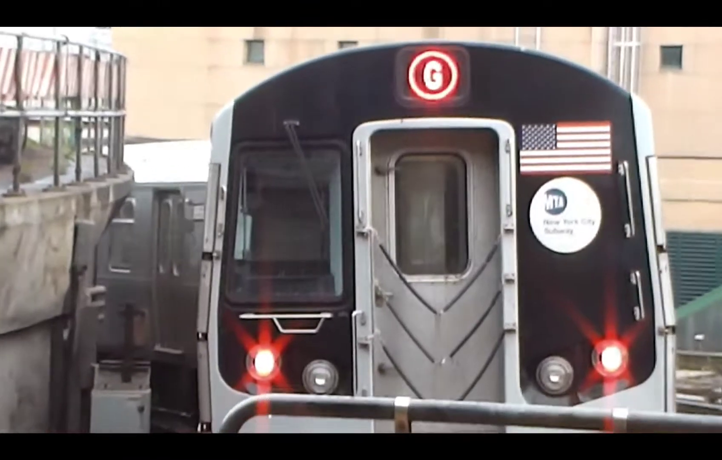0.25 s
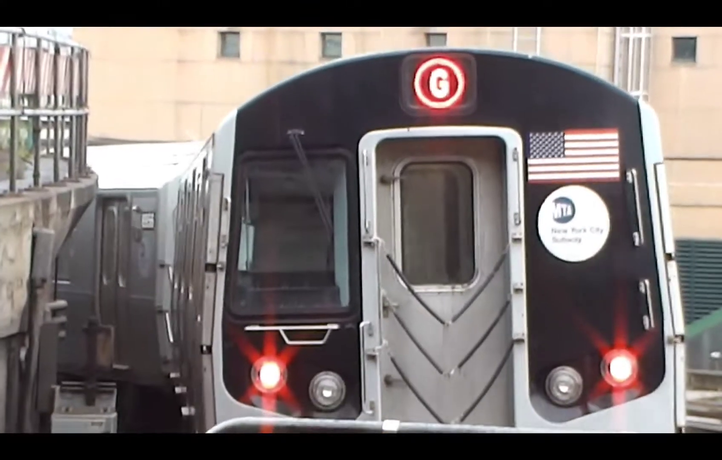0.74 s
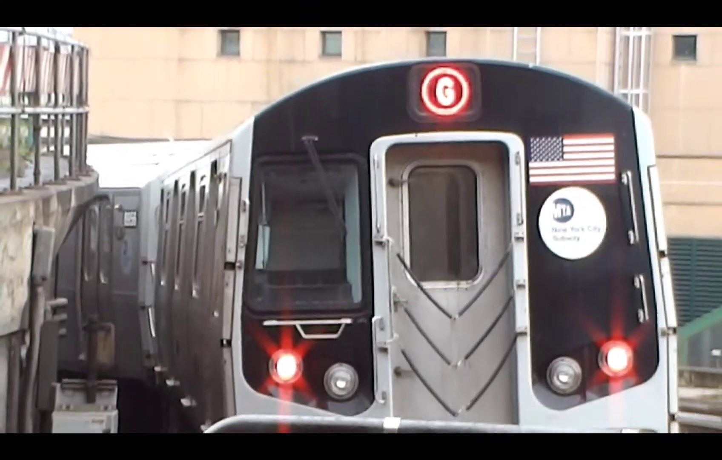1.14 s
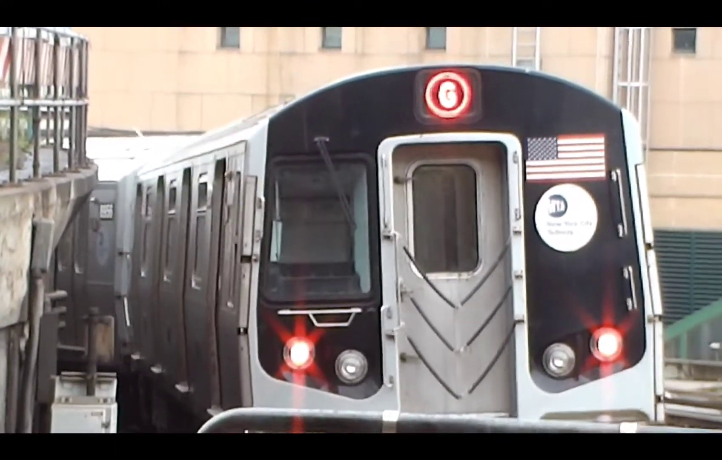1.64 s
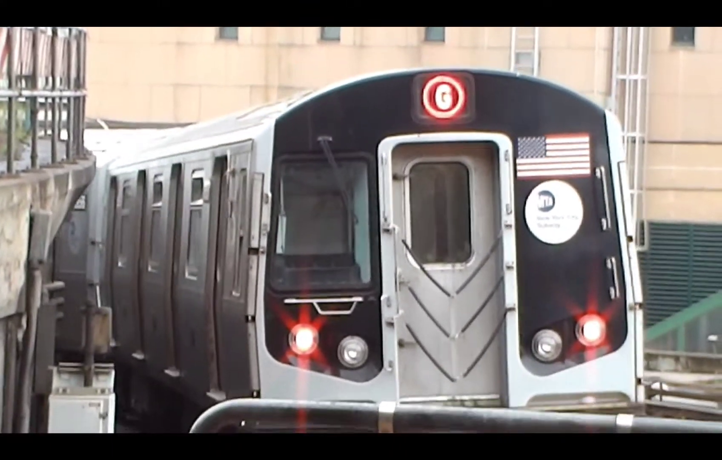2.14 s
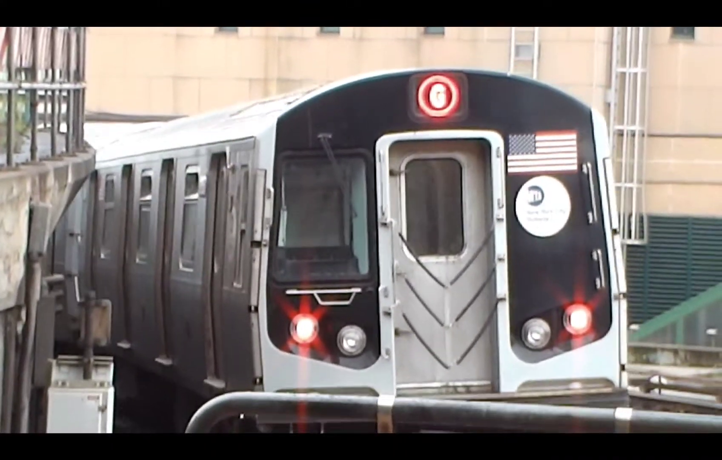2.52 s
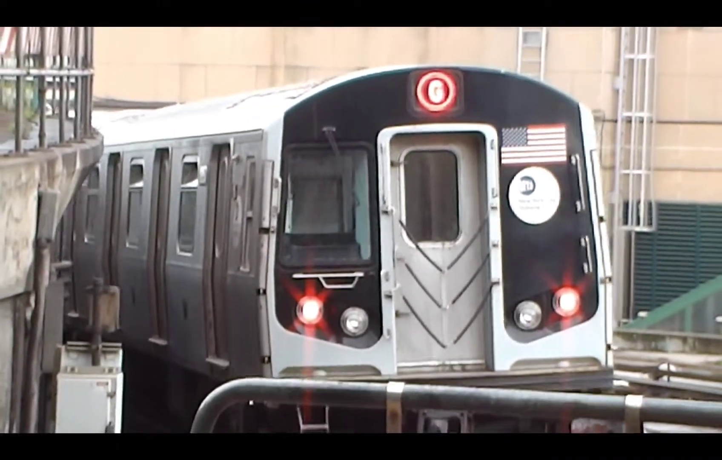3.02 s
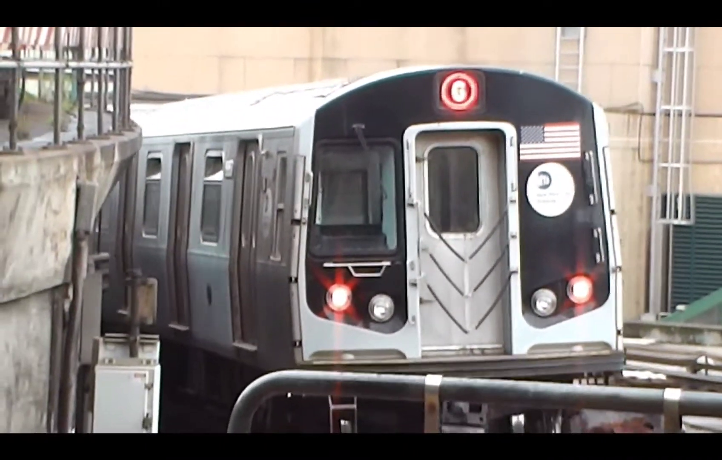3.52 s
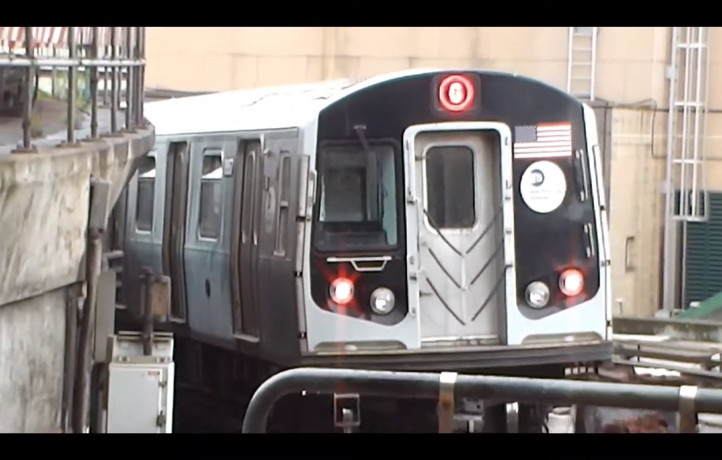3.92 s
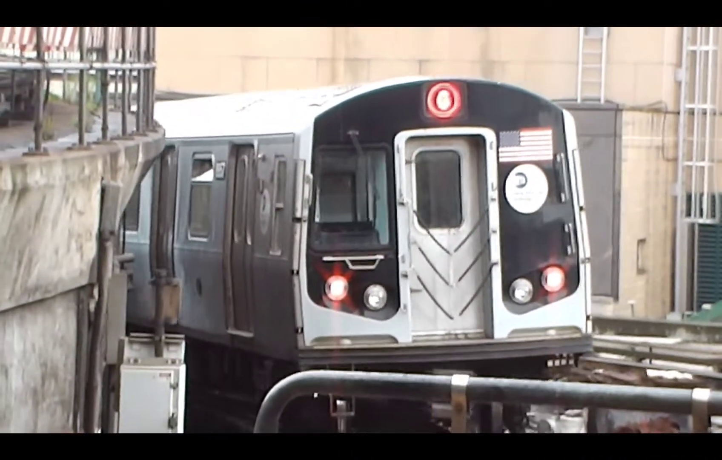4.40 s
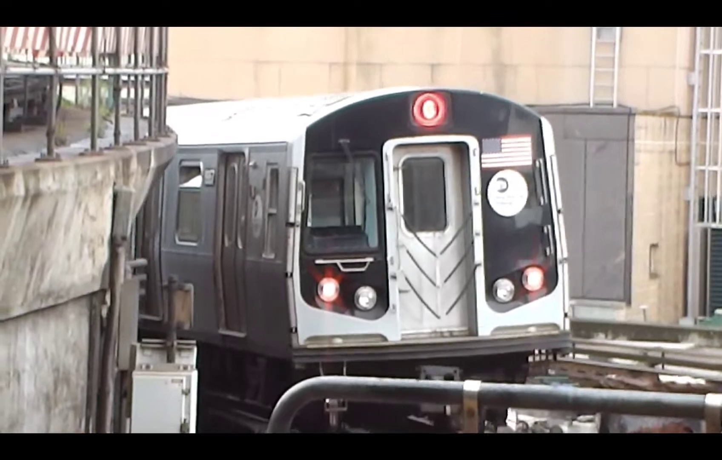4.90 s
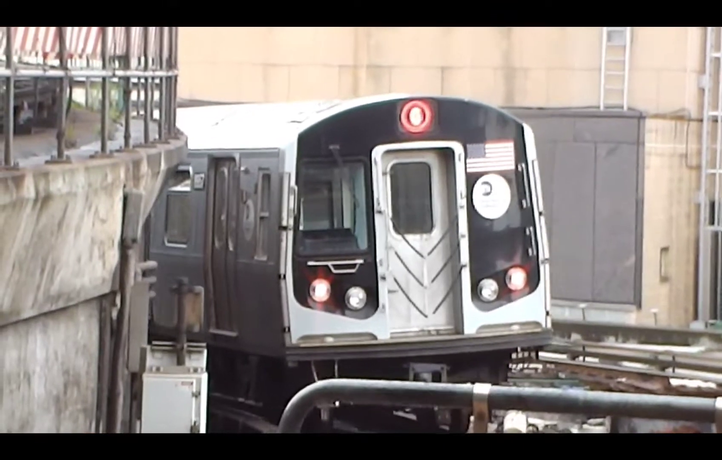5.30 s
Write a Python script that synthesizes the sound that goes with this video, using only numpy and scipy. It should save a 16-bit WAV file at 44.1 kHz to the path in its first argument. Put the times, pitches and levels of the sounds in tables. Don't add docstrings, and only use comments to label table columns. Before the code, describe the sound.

A subway train draws away round an outdoor curve, heard in stereo from near the track. A piercing, steady squeal pulses rapidly throughout over rumble, gear hum and scattered joint thumps. Flange hiss is harshest between one and two seconds, when low rail groans join. Later, higher metallic shrieks and thin breathy whistles come forward. The microphone's level dips after the sharpest peaks, and the squeal is still going at the end.

```python
import sys
import numpy as np
from scipy import signal
from scipy.fft import rfft, irfft, next_fast_len
from scipy.io import wavfile
from scipy.ndimage import uniform_filter1d

SR = 44100
rng = np.random.default_rng(int(sys.argv[2]) if len(sys.argv) > 2 else 0)


def persist_wave(psi):
    counts = np.round(np.clip(psi, -1, 1) * 32767).astype(np.int16)
    wavfile.write(sys.argv[1], SR, np.atleast_2d(counts).T)


def attenuation_scalar(level_db):
    decades = np.asarray(level_db, float) / 20
    return 10 ** decades


N = 244755
STEP = 20
MODES_FOLLOW = 0.608


def drift(rate, size=N, full=True):
    r = np.exp(-2 * STEP * np.pi * rate / SR)
    slow = signal.lfilter([1], [1, -2 * r, r * r], rng.standard_normal(size // STEP + 1001))[1000:]
    slow = slow * np.sqrt((1 - r * r) ** 3 / (1 + r * r))
    if not full:
        return slow
    return np.interp(np.arange(size) / STEP, np.arange(len(slow)), slow)


def load():
    # t/s, level/dB
    level_points = [(0, -22.5), (1.1, -21.5), (1.27, -23.5), (1.38, -26.5), (1.82, -28), (1.92, -21.5),
                    (2.17, -28), (2.28, -24), (2.6, -24.5), (2.85, -21.5), (3.25, -25), (3.5, -23),
                    (4.0, -23.5), (4.9, -23), (5.3, -23.5), (5.55, -24)]
    s, level_db = np.transpose(level_points)
    mean_db = -24
    return np.interp(np.arange(N) / SR, s, level_db) - mean_db


def bursts(rows, rise_db_s, fall_db_s):
    t = np.arange(0, N + STEP, STEP) / SR
    s, length, level_db = np.transpose(rows)[:3, :, None]
    rise = rise_db_s * np.maximum(s - t, 0)
    fall = fall_db_s * np.maximum(t - s - length, 0)
    return level_db - rise - fall


def over_rest(coarse_db, rest_db):
    loudest = coarse_db.max(axis=0)
    return np.maximum(np.interp(np.arange(N) / STEP, np.arange(len(loudest)), loudest), rest_db)


def at_hz(points, hz):
    table_hz, value = np.transpose(points)
    return np.interp(np.log(hz), np.log(table_hz), value)


def leaning(hz):
    # f/Hz, left minus right level/dB
    lean = [(60, 3), (700, 3), (2400, 2), (4400, 1.0), (8000, 0.2), (13000, 0.5)]
    return attenuation_scalar(at_hz(lean, hz) / 2 * np.array([[1], [-1]]))


def banded_noise(spectrum, patchy_db):
    # f/Hz, left-right likeness (0-1)
    likeness = [(60, 1), (500, 1), (1400, 0.94), (3000, 0.58), (8000, 0.65), (13000, 0.011)]
    size = next_fast_len(N)
    low_hz, high_hz = spectrum[0][0], spectrum[-1][0]
    hz = np.maximum(np.arange(size // 2 + 1) * SR / size, 1)
    alike = np.clip(at_hz(likeness, hz), 0, 1)
    mid, side = rfft(rng.standard_normal((2, size)))
    pair = np.array([np.sqrt(1 + alike) * mid + sign * np.sqrt(1 - alike) * side for sign in (1, -1)])
    pair = pair * attenuation_scalar(at_hz(spectrum, hz)) * leaning(hz) * (hz > low_hz) * (hz < high_hz)
    per_octave = 1.5
    place = np.log2(hz / low_hz) * per_octave
    out = 0
    for k in range(int(place[-1]) + 1):
        if low_hz * 2 ** ((k - 1) / per_octave) < high_hz:
            share = np.clip(1 - np.abs(place - k), 0, 1)
            out = out + attenuation_scalar(patchy_db * drift(7.9)) * irfft(pair * share, size)[:, :N]
    return out / np.sqrt(np.mean(out.mean(axis=0) ** 2))


def wheels(hz, spread_hz, wander_hz, flicker_db, count, twice_db=-60.0, rough=.3, rough_hz=60,
           width=0.54, limit=0.14, size=N):
    def chance(rate):
        return drift(rate, size, False)

    swing, sides = 0, np.array([[1], [-1]])
    for off in np.linspace(-1, 1, count) if count > 1 else [0]:
        detune = spread_hz * off + wander_hz * (chance(2.5) + 0.77 * chance(20.6))
        turn = 2 * np.pi * (np.cumsum(detune) * STEP / SR + rng.random())
        apart = (-.13 + width * chance(3.5)) * sides
        swing = swing + attenuation_scalar(flicker_db * chance(9.5)) * np.exp(1j * (turn + apart))
    swing = swing / (np.abs(swing).mean(axis=0) + 0.00093) ** np.clip(limit, 0, 1)
    power = uniform_filter1d(np.mean(np.abs(swing) ** 2, axis=0), size=170)
    swing = swing / np.sqrt(power + 1e-6)
    for share, reach_hz in ((rough, rough_hz), (0.17 * rough, 2.9 * rough_hz)):
        swing = swing + share * (chance(reach_hz) + 1j * chance(reach_hz)) * np.exp(-.2j * sides)
    carrier = np.exp(2j * np.pi * np.cumsum(hz + np.zeros(size)) / SR)
    tone = signal.resample_poly(swing, STEP, 1, axis=1)[:, :size] * carrier
    octave = attenuation_scalar(twice_db) * tone ** 2
    out = (tone + octave).real * leaning(np.mean(hz))
    return out / np.sqrt(np.mean(out.mean(axis=0) ** 2))


def catches(table, twice_db, rough, width, rough_hz=60):
    size = SR
    out = np.zeros((2, N + size))
    t = np.arange(size) / SR - .5
    for s, length, hz, level_db in table:
        start = round(s * SR)
        shape = attenuation_scalar(level_db) * np.exp(-(2 * t / length) ** 4)
        tone = wheels(hz, 0, 0.00361 * hz, 0.33, count=1, twice_db=twice_db, rough=rough,
                      rough_hz=rough_hz, width=width, size=size)
        out[:, start:start + size] += shape * tone
    return out[:, SR // 2:SR // 2 + N]


def rolling():
    # f/Hz, level/dB per Hz
    rumble = [(18, -16), (30, -10), (50, 1), (100, 3.5), (250, 3.5), (400, 3), (550, -5.5), (800, -13)]
    # f/Hz, level/dB per Hz
    roar = [(300, -2), (480, -2), (700, 0), (1000, -1.5), (1500, -6.5), (2000, -9.5), (2500, -23),
            (3500, -23.5), (6000, -28), (12000, -33.5)]
    # t/s, level/dB
    joints = [
        (.12, -18),
        (.45, -22.5),
        (1.06, -16),
        (1.7, -22.5),
        (2.902, -17),
        (3.469, -20.5),
        (4.171, -20.5),
        (5.23, -21),
    ]
    rise_db_s, fall_db_s, clatter_db = 82, 68, -3.5
    thumps = [(s, 0.027, level_db) for s, level_db in joints]
    rumble_db = over_rest(bursts(thumps, rise_db_s, fall_db_s), -23 + load())
    clatter = bursts(thumps, 3 * rise_db_s, 1.3 * fall_db_s) + clatter_db
    roar_db = over_rest(clatter, -25 + load())
    low = attenuation_scalar(rumble_db) * banded_noise(rumble, patchy_db=1.26)
    return low + attenuation_scalar(roar_db) * banded_noise(roar, patchy_db=1.4)


def hum():
    # f/Hz, level/dB
    orders = [
        (169.5, -15.5),
        (339, -2.5),
        (848, -16),
        (1680, -31),
    ]
    # t/s, length/s, level/dB
    pulls = [
        (0, 1.18, -24.5),
        (1.8, 0.2, -23.5),
        (2.28, 0.25, -23.5),
        (2.8, 0.18, -23),
        (3.2, 0.3, -27),
        (3.75, 0.41, -25.5),
        (4.3, 0.71, -24),
        (5.15, 0.12, -23),
    ]
    rest_db, follows = -30, 0.44
    level_db = over_rest(bursts(pulls, rise_db_s=56, fall_db_s=18), rest_db) + follows * load()
    out = 0
    for hz, order_db in orders:
        tone = wheels(hz, 0, wander_hz=1.2, flicker_db=-3.0, count=1, rough=0.086, width=0.065)
        out = out + attenuation_scalar(level_db + order_db) * tone
    return out


def city():
    # f/Hz, level/dB per Hz
    air = [(2500, -30), (8000, 0), (14000, -1), (15150, 1), (15600, -20)]
    return attenuation_scalar(-51) * banded_noise(air, patchy_db=1.2)


def flange():
    # f/Hz, level/dB per Hz
    bright_hiss = [(2500, -4), (3500, -2), (4500, 0), (6500, 1.5), (8750, 2.5), (11000, 2.5), (13000, 1),
                   (14600, -2.5), (15600, -7)]
    # f/Hz, level/dB per Hz
    far_hiss = [(2500, -5), (5000, 3), (8000, -6), (11000, -7), (13000, -9), (15100, -13), (15600, -24)]
    # t/s, length/s, level/dB
    rubs = [(0, 0.17, -45.5), (.53, 0.088, -41), (.68, 0.079, -45), (.88, 0.041, -43), (1.03, 0.11, -43),
            (1.2, 0.031, -36.5), (1.245, 0.2, -31), (1.42, 0.19, -32.5), (1.63, 0.14, -32),
            (1.82, 0.12, -36), (1.93, 0.064, -37.5), (2.05, 0.04, -42.5), (2.24, 0.078, -43.5),
            (2.815, 0.021, -34.5), (2.85, 0.052, -35), (2.93, .025, -40), (2.97, 0.12, -44),
            (3.7, 0.31, -41), (4.07, 0.11, -48), (4.36, 0.055, -46), (4.45, 0.1, -39), (4.55, .13, -42),
            (4.68, 0.32, -40.5), (5.08, 0.3, -43.5), (5.4, 0.19, -44.5)]
    rest_db, follows = -49.5, 0.26
    level_db = over_rest(bursts(rubs, rise_db_s=600, fall_db_s=140), rest_db + follows * load())
    hard = np.clip(uniform_filter1d((level_db + 49.0) / 14, size=1500), 0, 1)
    bright = np.sqrt(hard) * banded_noise(bright_hiss, patchy_db=1.5)
    dull = np.sqrt(1 - hard) * banded_noise(far_hiss, patchy_db=1.0)
    return attenuation_scalar(level_db + 4.0 + 0.77 * drift(22)) * (bright + dull)


def high_modes():
    # resting f/Hz, sag/Hz, spread/Hz, octave level/dB
    modes = [
        (4590, 64, 22, -37),
        (6092, 125, 28, -28),
        (6514, 95, 34, -22),
        (8380, 45, 20, -40),
    ]
    rests = [-48, -47.5, -47, -47.5]
    # t/s, length/s, level/dB, share of the sag (0-1)
    slips_4k5 = [(0, .03, -40, 0.14), (0.55, .14, -47, 0.2), (1.047, 0.051, -41, 0.27),
                 (2.27, 0.15, -39.5, 0.31), (2.854, 0.056, -30.5, 0.99), (3.001, 0.067, -36.5, 0.66),
                 (3.459, 0.053, -44.5, .2), (3.676, 0.35, -44, 0.17), (4.447, 0.07, -30.5, 0.94),
                 (4.767, 0.092, -37, 0.84), (4.951, .16, -34.5, 0.5), (5.195, 0.11, -38, 0.48),
                 (5.372, 0.13, -43, 0.55)]
    slips_6k = [(.02, 0.078, -36, 0.47), (.2, .1, -39.5, .4), (.9, .1, -42, 0.295), (1.031, 0.11, -37, .3),
                (2.88, 0.21, -41, 0.41), (3.269, 0.066, -38, 0.1), (3.349, 0.06, -36.5, 0.21),
                (3.699, 0.11, -43.5, 0.31), (3.83, 0.074, -33.5, 0.88), (3.93, 0.083, -29, 0.98),
                (4.038, 0.12, -27.5, 1), (4.22, 0.053, -31, 0.93), (4.4, 0.16, -40, 0.29),
                (4.699, 0.3, -40, 0.35), (5.0, 0.028, -39, 0.2), (5.3, 0.16, -41, 0.055)]
    slips_6k4 = [(0, 0.21, -44, 0.079), (0.602, .2, -33.5, 0.22), (.85, 0.074, -36, 0.062),
                 (1.041, 0.047, -28, 0.54), (1.171, 0.19, -32.5, 0.089), (1.4, 0.17, -37, 0.52),
                 (2.229, 0.091, -33, 0.55), (2.401, 0.055, -39.5, 0.3), (2.872, 0.02, -25.5, 0.9),
                 (2.896, .03, -28, 0.66), (3.36, 0.2, -38, 0.038), (3.681, 0.22, -36, 0.41),
                 (3.95, 0.066, -34, 0.23), (4.08, .1, -34.5, 0.31), (4.45, .03, -34.5, 0.593),
                 (4.49, 0.089, -28.5, 0.86), (4.641, 0.074, -26.5, 0.95), (4.763, .15, -25.5, 1),
                 (4.97, 0.11, -29, 0.61), (5.221, 0.043, -36.5, 0.17), (5.401, .1, -38.5, 0.086)]
    slips_8k4 = [(0, 0.12, -37.5, 0.089), (.22, 0.17, -43, 0.026), (0.902, 0.23, -43, 0.097),
                 (2.201, .4, -45.5, 0.43), (2.858, 0.092, -47, 0.11), (3.17, 0.22, -40.5, 0.088),
                 (3.88, 0.29, -44, 0.055), (4.472, 0.081, -40.5, 0.74), (4.752, 0.096, -34, 0.897),
                 (4.898, 0.17, -33, 0.95), (5.15, 0.21, -28.5, 0.94), (5.4, 0.13, -31.5, 0.76)]
    pull_db = 4.5
    out = 0
    all_slips = (slips_4k5, slips_6k, slips_6k4, slips_8k4)
    for (hz, sag_hz, spread_hz, twice_db), slips, rest_db in zip(modes, all_slips, rests):
        each_db = bursts(slips, rise_db_s=447.5, fall_db_s=131.5)
        rest_db = rest_db + MODES_FOLLOW * load()
        level_db = over_rest(each_db, rest_db)
        share = np.repeat(np.array(slips)[each_db.argmax(axis=0), 3], STEP)[:N]
        sag = sag_hz * share * np.clip((level_db - rest_db) / pull_db, 0, 1)
        octave_db = twice_db + 0.54 * (level_db + 27)
        tone = wheels(hz - uniform_filter1d(sag, size=2000), spread_hz, wander_hz=12, flicker_db=5.0, count=3,
                      twice_db=octave_db, rough=0.46, rough_hz=89, width=0.36, limit=0.13)
        out = out + attenuation_scalar(level_db) * tone
    return out


def ringing_modes():
    # f/Hz, spread between wheels/Hz, roughness (0-1)
    modes = [
        (3023, 38, 0.67),
        (4036, 16, 0.76),
        (4790, 6, 0.6),
    ]
    rests = [-56.5, -41.5, -49.5]
    # t/s, length/s, level/dB
    rings_3k = [(0.007, 0.27, -41), (0.277, 0.057, -36), (0.497, 0.12, -46), (0.647, 0.48, -42.5),
                (1.246, 0.1, -56), (2.83, 0.13, -44.5), (3.477, 0.063, -44), (3.693, 0.15, -48),
                (4.407, 0.077, -47), (4.565, 0.27, -44.5)]
    rings_4k = [(0.101, 0.055, -33.5), (0.2, 0.11, -39), (0.983, 0.04, -34), (1.034, 0.061, -31.5),
                (1.129, .03, -35), (1.68, .3, -43), (2.1, .35, -43), (2.559, 0.045, -36.5),
                (2.622, .03, -36), (2.697, 0.059, -35.5), (2.813, 0.03, -34), (2.86, 0.053, -34),
                (2.975, 0.12, -33), (3.16, 0.077, -37.5), (3.34, .15, -38), (3.747, 0.14, -36.5),
                (3.92, .08, -41), (4.1, 0.21, -38.5), (5.253, 0.037, -36)]
    rings_4k8 = [(0.536, 0.16, -35), (1.95, 0.89, -51), (2.6, .4, -45.5), (3.05, 0.12, -52),
                 (3.221, 0.097, -42), (3.4, 0.24, -44.5), (4.4, 0.13, -44), (4.699, 0.26, -42.5),
                 (5.05, 0.15, -43), (5.251, 0.21, -43)]
    out = 0
    for (hz, spread_hz, rough), rings, rest_db in zip(modes, (rings_3k, rings_4k, rings_4k8), rests):
        each_db = bursts(rings, rise_db_s=350, fall_db_s=115)
        level_db = over_rest(each_db, rest_db + MODES_FOLLOW * load())
        tone = wheels(hz, spread_hz, wander_hz=.4 * spread_hz, flicker_db=3, count=3, rough=rough,
                      rough_hz=64.4, width=0.5, limit=.4)
        out = out + attenuation_scalar(level_db) * tone
    return out


def squeal():
    # t/s, length/s, level/dB, f/Hz
    surges_near = [(0.067, 0.012, -22, 2029), (0.105, 0.017, -19, 2014), (0.135, 0.0069, -19.0, 2023),
                   (0.212, 0.017, -24, 2011), (0.224, 0.016, -21, 2019), (0.253, 0.02, -23, 2022),
                   (0.304, 0.011, -19, 2013), (0.339, 0.026, -15, 2011), (0.437, 0.01, -21.5, 2018),
                   (0.449, 0.015, -16, 2027), (0.5, 0.02, -20.0, 2017), (0.521, 0.022, -23, 2023),
                   (0.562, 0.023, -18.5, 2031), (0.61, 0.013, -18.5, 2014), (0.639, 0.032, -19.0, 2059),
                   (0.674, 0.012, -18.5, 2019), (0.738, 0.044, -17.5, 2024), (0.798, 0.017, -24.5, 2031),
                   (0.853, 0.027, -19.5, 2019), (0.889, 0.018, -18.5, 2005), (0.912, 0.011, -21, 2008),
                   (0.934, 0.019, -16.0, 2012), (0.96, 0.01, -18.5, 2005), (0.987, 0.022, -15.5, 2009),
                   (1.018, 0.016, -16, 2004), (1.047, 0.0067, -16.5, 2008), (1.08, 0.021, -18, 2014),
                   (1.103, 0.012, -18.5, 2001), (1.142, 0.063, -15, 2016), (1.235, 0.033, -20.5, 2027),
                   (1.311, 0.039, -19, 2006), (1.397, 0.03, -25, 2000), (1.451, 0.06, -20.5, 2009),
                   (1.501, 0.011, -21.5, 2022), (1.534, 0.01, -23, 2003), (1.565, 0.012, -20.5, 2021),
                   (1.591, 0.016, -20, 2015), (1.645, 0.027, -18, 2004)]
    surges_mid = [(1.719, 0.034, -22.5, 2041), (1.768, 0.012, -22.5, 2024), (1.791, 0.029, -20, 2013),
                  (1.87, 0.019, -19, 1990), (1.908, 0.011, -19.0, 2017), (1.928, 0.036, -17.5, 2010),
                  (1.971, 0.02, -17, 2009), (2.011, 0.018, -11.5, 2005), (2.056, 0.014, -17.5, 2018),
                  (2.093, 0.017, -15.5, 2008), (2.12, 0.029, -20.5, 2015), (2.157, 0.036, -17.5, 2012),
                  (2.287, 0.04, -16.5, 2016), (2.341, 0.04, -18, 2016), (2.384, 0.049, -17, 1996),
                  (2.454, 0.036, -16, 2028), (2.496, 0.014, -19, 2019), (2.516, 0.017, -16.5, 2030),
                  (2.55, 0.019, -18, 2012), (2.597, 0.018, -19, 2006), (2.634, 0.026, -18, 2010),
                  (2.673, 0.029, -16.5, 1983), (2.742, 0.018, -14, 2024), (2.767, 0.033, -17, 2000),
                  (2.823, 0.031, -15, 2000), (2.863, 0.017, -18.5, 2020), (2.947, 0.019, -15.5, 2016),
                  (3.007, 0.029, -18, 2028), (3.064, 0.017, -15.5, 1998), (3.098, 0.039, -17, 2024),
                  (3.164, 0.012, -19, 2014), (3.201, 0.012, -18, 2017), (3.255, 0.03, -14.5, 2017),
                  (3.342, 0.031, -19, 2009), (3.395, 0.047, -15, 2018), (3.511, 0.045, -12.5, 2018),
                  (3.582, 0.019, -19, 2012), (3.612, 0.021, -18, 2010)]
    surges_far = [(3.654, 0.014, -19.5, 2032), (3.714, 0.0099, -16.5, 2023), (3.742, 0.011, -17.5, 2011),
                  (3.778, 0.011, -19, 1998), (3.81, 0.017, -18.5, 2013), (3.837, 0.043, -17, 2032),
                  (3.922, 0.012, -18.0, 2019), (3.94, 0.013, -18.5, 2022), (3.993, 0.037, -14.5, 2025),
                  (4.043, 0.015, -15.5, 2007), (4.14, 0.014, -15, 2021), (4.16, 0.013, -20.0, 2013),
                  (4.188, 0.042, -16, 2027), (4.26, 0.02, -17.5, 2019), (4.29, 0.04, -19.5, 2013),
                  (4.342, 0.012, -21, 2020), (4.376, 0.051, -16, 2029), (4.43, 0.018, -19, 2023),
                  (4.458, 0.023, -18.5, 2024), (4.492, 0.014, -23, 2014), (4.516, 0.021, -21.5, 2016),
                  (4.565, 0.016, -19.5, 2003), (4.641, 0.013, -18, 2003), (4.707, 0.016, -20, 2017),
                  (4.771, 0.063, -19.5, 2018), (4.859, 0.0095, -14.5, 2013), (4.899, 0.026, -15, 2004),
                  (5.048, 0.012, -23, 2026), (5.06, 0.041, -18.0, 2020), (5.131, 0.033, -18.5, 2015),
                  (5.165, 0.013, -21, 2025), (5.191, 0.015, -19, 2012), (5.25, 0.012, -20.5, 2012),
                  (5.271, 0.024, -19.5, 2022), (5.317, 0.033, -20, 2032), (5.39, 0.023, -20.5, 2002),
                  (5.434, 0.053, -18, 2031), (5.515, 0.014, -18.5, 2013)]
    surges = np.vstack([surges_near, surges_mid, surges_far])
    each_db = bursts(surges, rise_db_s=902, fall_db_s=910)
    lead = np.repeat(each_db.argmax(axis=0), STEP)[:N]
    turns = np.cumsum(rng.uniform(-.5, .5, len(surges)))[lead]
    hz = uniform_filter1d(surges[lead, 3], size=500)
    hz = hz + uniform_filter1d(np.gradient(turns) * SR, size=300)
    tones = wheels(hz, spread_hz=1.5, wander_hz=1.5, flicker_db=1.5, count=1, rough=0.18, rough_hz=39.0,
                   width=0.28, limit=0.99)
    skirt_shape = [(1800, -43), (1950, -7.5), (2020, 1.5), (2100, -10.5), (2250, -26.5), (2450, -29.0)]
    skirt = banded_noise(skirt_shape, patchy_db=2.5)
    early = attenuation_scalar(-5 * np.clip(np.arange(N) / SR - .9, 0, 1))
    level_db = over_rest(each_db - 0.25, -28) - 0.082 * load()
    return attenuation_scalar(level_db) * tones + attenuation_scalar(-23.5) * early * skirt


def wheel_chirps():
    # t/s, length/s, f/Hz, level/dB; the 912 Hz one at 1.24 s sits an octave over the rail groan
    chirps = [(.06, .16, 1492, -34), (.135, .05, 490, -27), (.9, .09, 2240, -36), (.9, .25, 1322, -38),
              (3.8, .08, 2135, -33), (5.27, .07, 2215, -36), (.63, .2, 4772, -35), (.66, .08, 2072, -24),
              (.83, .08, 2215, -36), (1.08, .16, 4955, -43), (1.07, .06, 775, -31), (1.24, .16, 912, -29),
              (1.25, .1, 2130, -32), (1.41, .1, 1135, -32), (2.87, .08, 2222, -34), (2.93, .1, 1132, -33),
              (3.72, .2, 265, -28), (3.98, .08, 1135, -32), (4.12, .06, 1140, -35), (4.9, .6, 5380, -50)]
    return catches(chirps, twice_db=-40, rough=0.14, width=0.09)


def far_whistles():
    # t/s, length/s, f/Hz, level/dB
    whistles = [
        (.25, .5, 10250, -56),
        (3.25, .2, 10280, -54),
        (3.95, .52, 11880, -49),
        (4.85, .45, 11900, -50),
        (5.28, .12, 11900, -50),
        (4.95, .6, 10250, -54),
        (4.5, .14, 10600, -50),
        (4.95, .7, 14800, -56),
        (3.8, .14, 7040, -42),
        (3.92, .32, 8060, -41),
    ]
    return catches(whistles, twice_db=-60, rough=2.5, width=.5, rough_hz=120)


def rail_groans():
    # t/s, length/s, f/Hz, level/dB
    groans = [(1.2, 0.097, 453.5, -20.5), (1.29, 0.13, 454, -20), (1.6, 0.13, 462, -26.5),
              (1.75, 0.17, 445, -28.5), (2.0, 0.28, 456.8, -21), (2.33, 0.1, 488.5, -21),
              (2.47, 0.26, 462.5, -19.5), (2.72, 0.15, 461.2, -25.5), (2.85, 0.087, 465, -21),
              (3.0, 0.15, 447.5, -23), (3.55, 0.2, 452, -27), (3.9, 0.42, 458, -34),
              (5.4, 0.23, 457.7, -28)]
    return catches(groans, twice_db=-28, rough=0.37, width=.04)


def scene():
    train = rolling() + hum() + flange()
    singing = high_modes() + ringing_modes() + squeal()
    single_wheels = wheel_chirps() + far_whistles()
    return train + city() + singing + single_wheels + rail_groans()


def low_pass(x):
    return signal.sosfilt(signal.butter(12, 15500, fs=SR, output="sos"), x)


def record(dry):
    # t/s, depth/dB
    ducks = [(0.351, 2.5), (0.951, 2), (1.599, 3), (2.005, 2.5), (2.21, 0), (2.69, 3.5), (3.275, 4),
             (3.521, 3.5), (4.008, 4.5), (4.209, 3), (4.649, 2.5)]
    knee_db, squeeze, release_db_s, makeup_db = -6.5, 0.59, 37.0, 2.0
    peak_db = 20 * np.log10(np.abs(dry).max(axis=0) + 1e-9)
    over = np.maximum(peak_db - knee_db, 0) * squeeze
    ramp = release_db_s * np.arange(N) / SR
    held = np.maximum.accumulate(over + ramp) - ramp
    dips = [(s + 0.01, 0, depth_db) for s, depth_db in ducks]
    ducked = over_rest(bursts(dips, rise_db_s=300, fall_db_s=27.5), 0)
    gain = attenuation_scalar(makeup_db - ducked - uniform_filter1d(held, size=130))
    mix = 1.866 * np.tanh(dry * gain / 1.742)
    return low_pass(mix)


dry = scene()
out = record(dry)
persist_wave(out)
```